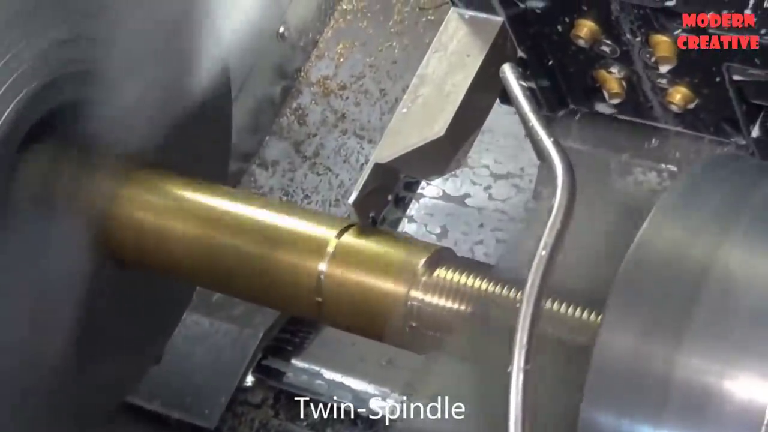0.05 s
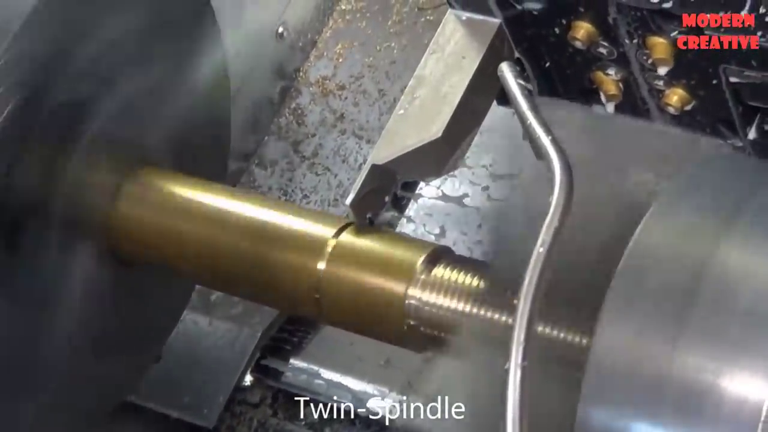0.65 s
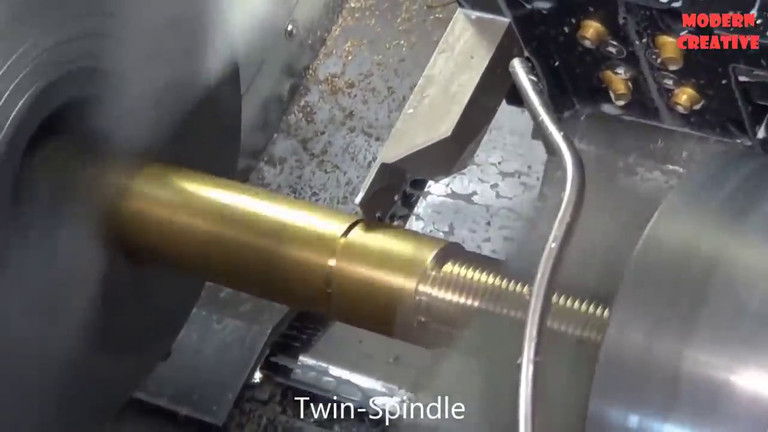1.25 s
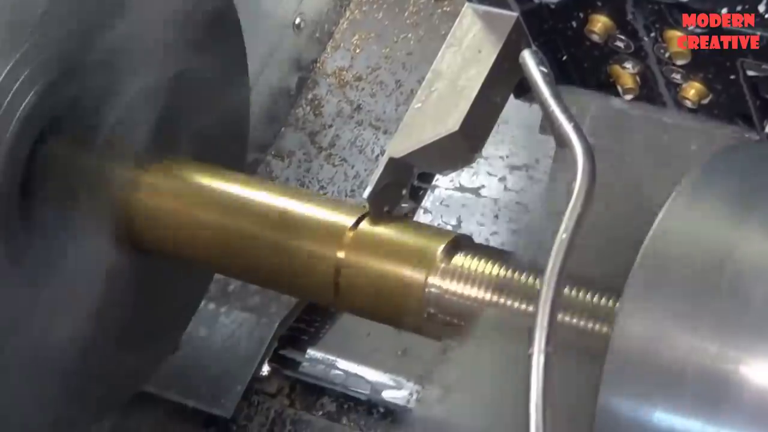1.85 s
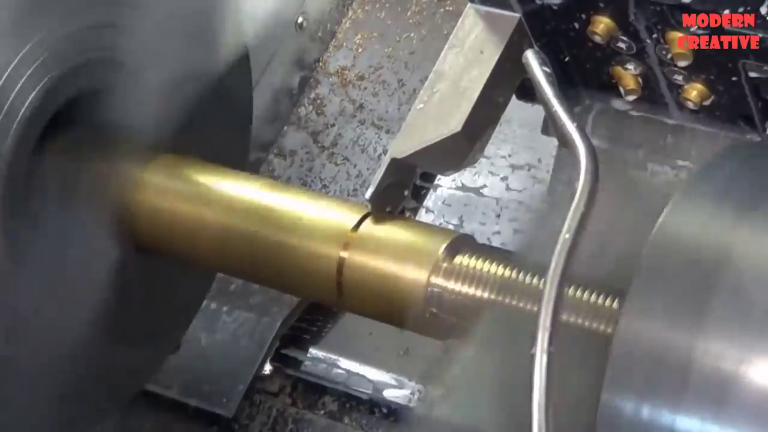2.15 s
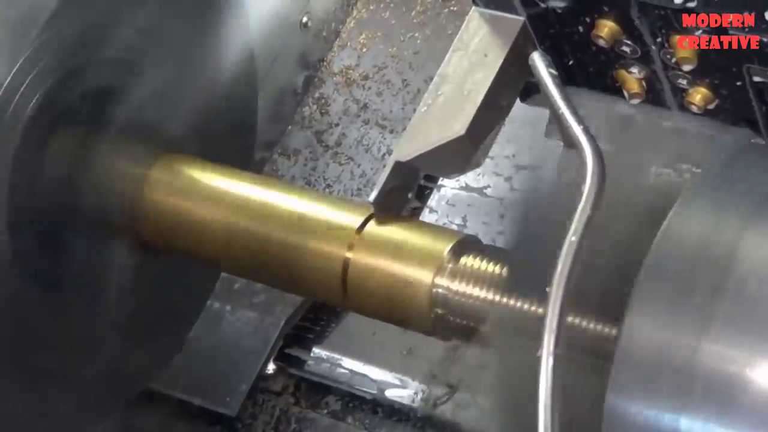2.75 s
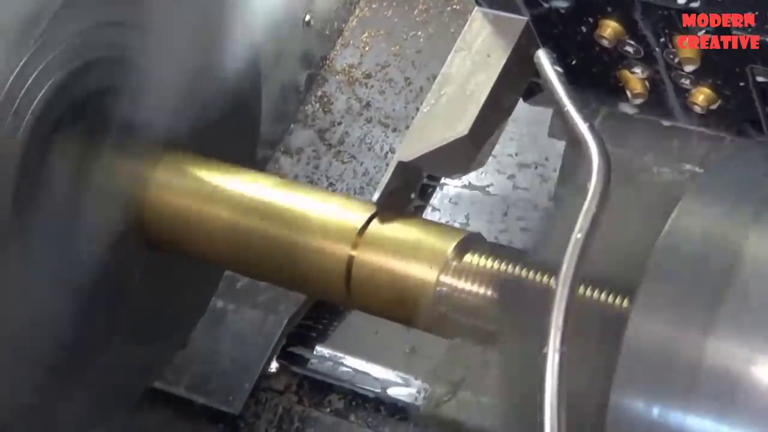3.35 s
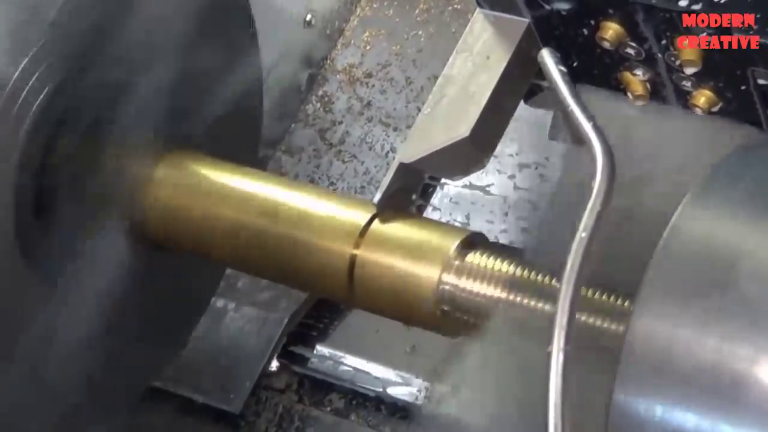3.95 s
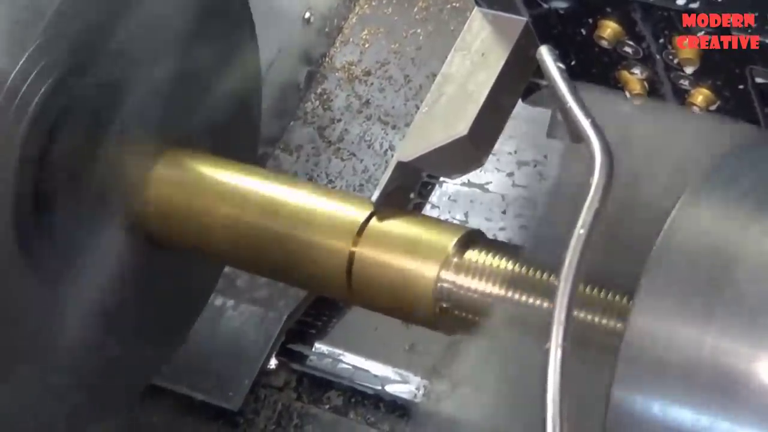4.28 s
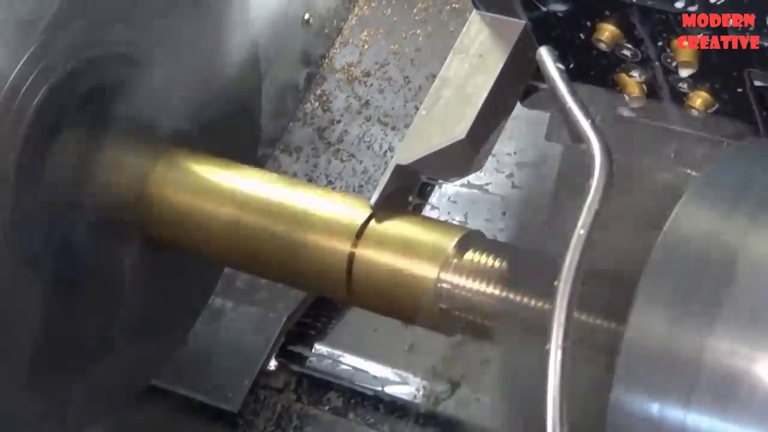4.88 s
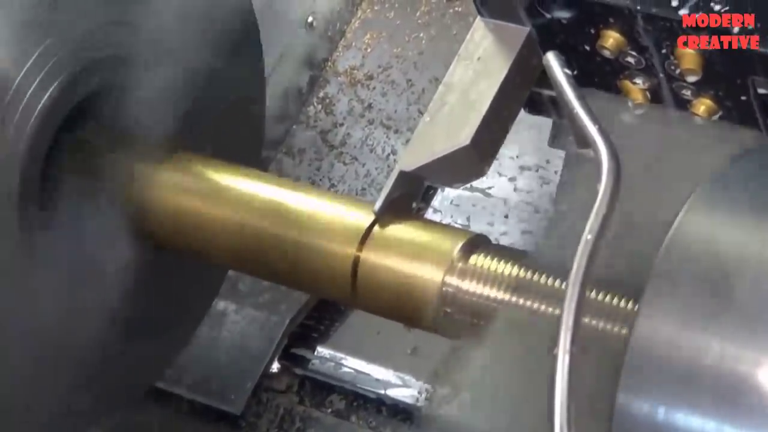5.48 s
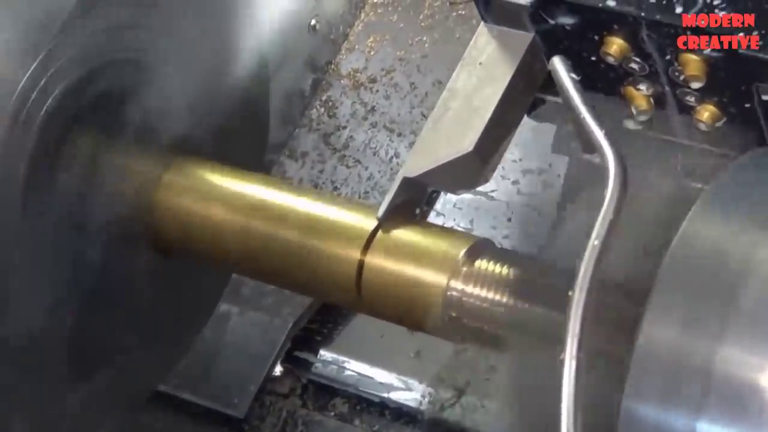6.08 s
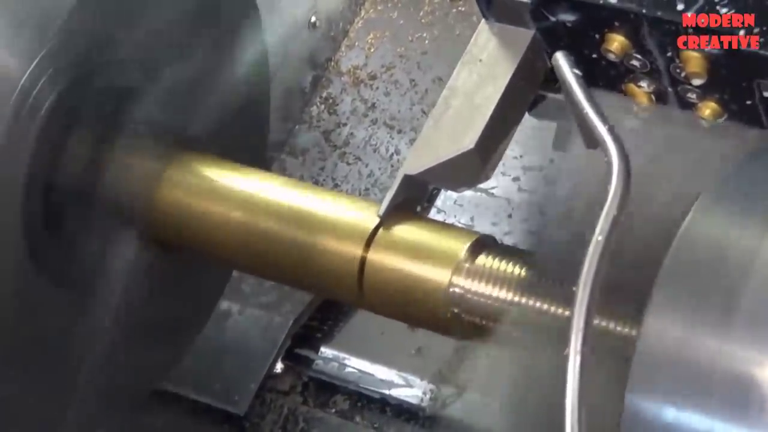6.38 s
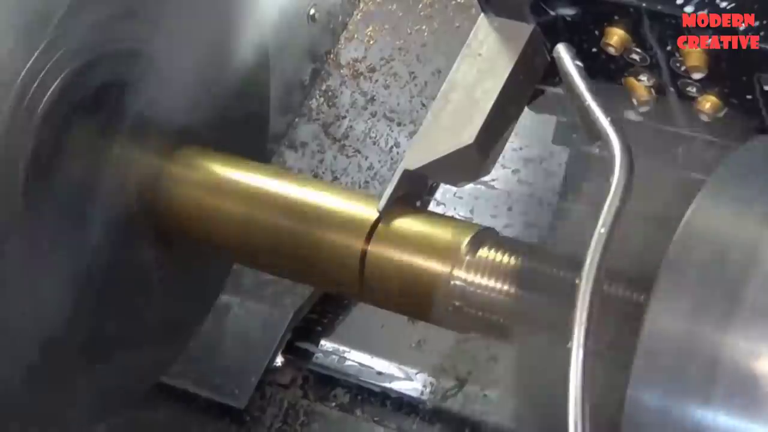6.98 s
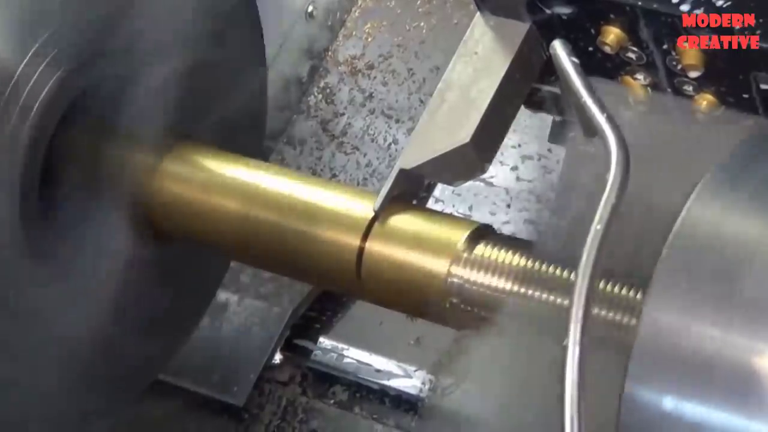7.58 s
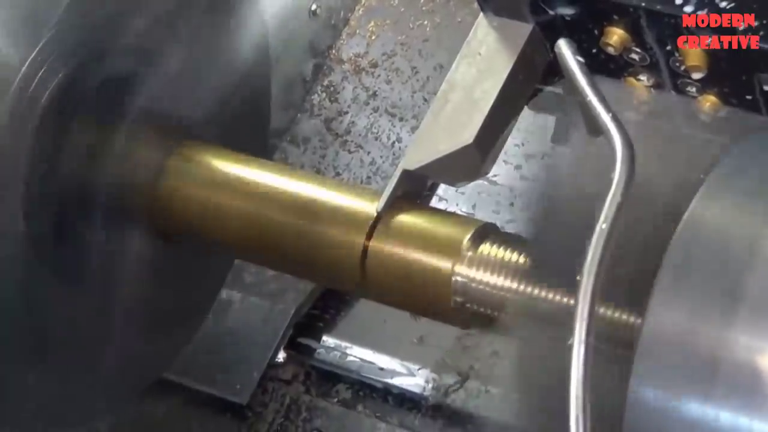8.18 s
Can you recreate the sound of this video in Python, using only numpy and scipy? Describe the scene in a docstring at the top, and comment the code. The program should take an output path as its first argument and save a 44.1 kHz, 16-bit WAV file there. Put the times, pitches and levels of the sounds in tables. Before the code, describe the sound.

A lathe blade cuts into a spinning brass bar, heard close up inside the machine's metal enclosure. A high hissing whistle slowly sinks in pitch over a steady rumble and hum. About halfway through, the blade chatters and swells into a piercing, fluttering squeal. Near the end the squeal slides downward and breaks up into a rough rubbing rasp.

```python
"""Inside the enclosure of a CNC lathe, a parting tool cuts through a spinning brass bar.
As the groove deepens the cutting speed falls, so the chip breaks off ever more slowly: a hissing
whistle that sinks over the rumble of the machine. The blade chatters at its own resonance and swells
into a squeal. The chip rate meets that squeal and drags it down, and the cut ends in a rough rasp
as the tool rubs near the centre."""
import sys
import numpy as np
from scipy import signal
from scipy.fft import rfft, irfft, next_fast_len
from scipy.io import wavfile

SR = 44100
rng = np.random.default_rng(int(sys.argv[2]) if len(sys.argv) > 2 else 0)


def wav_record(signal):
    """Record a signal, one row per channel, as 16-bit PCM in the file named by sys.argv[1]."""
    frames = np.transpose(np.atleast_2d(signal))
    bounded = np.clip(frames, -1, 1)
    # unit amplitude maps onto the largest positive 16-bit level
    quanta = np.round(bounded * 32767).astype(np.int16)
    wavfile.write(sys.argv[1], SR, quanta)


N = 362943
TIME = np.arange(N) / SR
BINS = np.maximum(np.arange(N // 2 + 1) * SR / N, 1)
TURN_HZ, CHUCK_JAWS = 15.03, 3
RUB_AT_S, RUB_RISE_S = 6.84, 1.58


def from_db(db):
    """Decibels to gain."""
    return 10 ** (np.asarray(db) / 20)


def rms_one(x):
    """Scale to unit power."""
    return x / np.sqrt(np.mean(np.abs(x) ** 2) + 1e-20)


def ramp(start_s, length_s):
    """Rise evenly from 0 to 1, then hold."""
    return np.clip((TIME - start_s) / length_s, 0, 1)


def bumps(rows):
    """Bell-shaped changes of level, in dB."""
    return sum(db * np.exp(-((TIME - s) / half_s) ** 2) for s, half_s, db in rows)


def in_time(points):
    """A curve read at every sample."""
    return np.interp(TIME, *np.transpose(points))


def at_bins(points):
    """A spectrum read on a log-frequency axis."""
    hz, value = np.transpose(points)
    return np.interp(np.log(BINS), np.log(hz), value)


def cycles(hz):
    """Phase of a changing frequency, in radians."""
    return 2 * np.pi * np.cumsum(hz) / SR


def shape(x, gain):
    """Filter by a gain given at BINS."""
    size = next_fast_len(N + 4096, True)
    response = np.interp(np.arange(size // 2 + 1) * SR / size, BINS, gain)
    return irfft(rfft(x, size) * response, size)[..., :N]


def resonances(modes):
    """Joint gain of several resonances."""
    return np.sqrt(sum(from_db(db) ** 2 / (1 + ((BINS - hz * hz / BINS) / width) ** 2)
                       for hz, width, db in modes))


def drift(rate_hz):
    """Smooth random wander of unit power."""
    pole, run_in = np.exp(-2 * np.pi * rate_hz / SR), SR // 2
    wander = signal.lfilter([1], [1, -2 * pole, pole * pole], rng.standard_normal(N + run_in))
    return rms_one(wander[run_in:])


def stereo_noise(gain):
    """Coloured noise of unit power, slightly different left and right."""
    # likeness of the channels: frequency_hz, correlation
    likeness = [(30, .99), (60, 0.88), (125, 0.95), (250, 0.97), (500, 0.96), (1000, 0.96), (2400, 1),
                (6000, 0.89), (15000, 1)]
    alike = np.clip(at_bins(likeness), 0, .995)
    mid = shape(rng.standard_normal(N), gain * np.sqrt(1 + alike))
    side = shape(rng.standard_normal(N), gain * np.sqrt(1 - alike))
    return rms_one(np.array([mid + side, mid - side]))


def each_turn(x, memory):
    """The tool meets the marks it left one turn before, so part of x comes round again."""
    lag, out = round(SR / TURN_HZ), x.copy()
    for i in range(lag, N, lag):
        out[i:i + lag] += memory * out[i - lag:i][:N - i]
    return rms_one(out)


def cut_level(db, bite_db, db_per_s, chatter_db, rub_db):
    """A layer's envelope in dB: the tool bites, the speed falls, chatter takes over, the tool rubs."""
    # brief dips in level: centre_s, half_length_s, gain_db
    dips = [(2.8, 0.34, -1), (4.196, .14, -1)]
    bite = bite_db * np.exp(-TIME / 0.69)
    chatter = chatter_db * ramp(start_s=4.03, length_s=.1)
    rub = rub_db * ramp(RUB_AT_S, RUB_RISE_S)
    return db + db_per_s * TIME + bite + chatter + rub + bumps(dips)


def chip_and_blade():
    """Chip rate and blade pitch in Hz, and their lock (0-1): once they meet they sink together."""
    # the chip breaks more slowly as the radius shrinks: time_s, rate_hz
    chip_rate = [(0, 9240), (1, 7840), (2.4, 6060), (3.3, 5510), (4, 4840), (5, 3720), (5.5, 3440),
                 (6.6, 2556), (8.23, 1230)]
    # the blade holds its pitch until the chip drags it down: time_s, pitch_hz
    blade_pitch = [(0, 2294), (6.3, 2293), (6.67, 2274), (7.19, 2152), (7.3, 2040), (7.56, 1950),
                   (7.75, 1660), (8.23, 1350)]
    pitch = in_time(blade_pitch)
    rate = np.maximum(in_time(chip_rate), pitch)
    lock_width_hz = 326
    return rate, pitch, 1 / (1 + ((rate - pitch) / lock_width_hz) ** 2)


def swing_size(pitch):
    """Chatter in dB from full swing: it grows, creeps up, weakens off resonance and collapses."""
    resonance_hz, width_hz = 2294, 116
    grow_at_s, grow_s = 3.104, 0.97
    growth_db = 12.5 * (ramp(grow_at_s, grow_s) - 1)
    creep_db = 3 * (ramp(grow_at_s + grow_s, length_s=2.25) - 1)
    detuned_db = 10 * np.log10(1 + ((resonance_hz - pitch) / width_hz) ** 2)
    collapse_db = 15 * ramp(start_s=7.5, length_s=0.22)
    return growth_db + creep_db - detuned_db - collapse_db


def holder_colour():
    """The tool holder's resonances lift the cutting noise as it passes."""
    # holder modes: pitch_hz, width_hz, gain_db
    modes = [(3605, 75, 10.5), (4300, 34, 7), (5782, 65, 14), (6300, 35, -24), (6910, 65, 4.5),
             (7440, 82, 1.5), (8960, 22, 12.5), (9360, 26, 8), (9590, 220, 8.5), (10650, 82, 8.5),
             (11350, 100, 7), (12250, 65, 7.5), (12400, 80, -5)]
    return np.sqrt(1 + resonances(modes) ** 2)


def machine():
    """Chuck and drives rumble and hum over a steady low background and a faint hiss."""
    # hum of drives and pump: pitch_hz, relative_db
    hum_tones = [(99, -85.5), (198, -70), (301, -73.5), (1130, -72)]
    # spectra of the rumble, the low background and the hiss: frequency_hz, relative_db
    rumble_colour = [(25, -28), (60, -29), (100, -18), (150, -9.5), (200, 1), (250, 0), (310, 0),
                     (460, 2.5), (580, -0.5), (750, 0), (860, -3), (945, 6.5), (1050, -5.5), (1300, -6.5),
                     (1500, 1), (3000, -13), (16000, -19)]
    shop_colour = [(20, -7), (45, -2), (70, 4), (130, 1), (400, -20), (4000, -47)]
    air_colour = [(1500, -32), (6000, 13), (10000, -9), (13500, 10), (15700, -2)]
    level_db = cut_level(db=-51.5, bite_db=-6.5, db_per_s=-0.5866, chatter_db=-3.5, rub_db=12)
    hum = sum(from_db(db + 4 + 2 * drift(16)) * np.sin(cycles(hz + 2.365 * drift(5.5)))
              for hz, db in hum_tones)
    rumble = from_db(level_db + 1.55 * drift(26)) * stereo_noise(from_db(at_bins(rumble_colour)))
    shop = from_db(-79) * stereo_noise(from_db(at_bins(shop_colour)))
    air = from_db(-50) * stereo_noise(from_db(at_bins(air_colour)))
    return rumble + hum * from_db(level_db - np.mean(level_db)) + shop + air


def chip_whistle(swing_db, rate, pitch, lock, holder):
    """The chip shears off almost regularly; the swinging blade chops it into sum tones and rasps."""
    # tones at the chip rate plus a multiple of the blade's pitch: multiple, relative_db
    sum_tones = [(1, 1.5), (2, -4.5), (3, -4), (4, -5), (5, -19)]
    # the whistle swells or fades for a moment: centre_s, half_length_s, gain_db
    swells = [(3.2, 0.38, 2), (4.15, 0.28, -3), (4.55, 0.13, 4), (5.1, 0.18, 1), (5.9, 0.53, -4),
              (7.05, 0.23, -8), (8.15, 0.25, -1)]
    jitter_hz, slip_hz = 452, 57.9
    irregular = .069 * (1 - lock) + .048 * lock   # share of the rate; steadier when locked
    shear = cycles(rate * (1 + irregular * drift(jitter_hz)))
    contact = cycles(pitch + slip_hz * drift(jitter_hz))   # the contact slips, so high tones blur
    audible = lambda hz: np.clip((SR * .45 - hz) / 2000, 0, 1)

    octave_db = cut_level(db=-3, bite_db=-7, db_per_s=-0.32, chatter_db=-12, rub_db=11.5) + 12.5 * lock
    force = from_db(bumps(swells)) * np.cos(shear)
    force += from_db(octave_db) * np.cos(2 * shear) * audible(2 * rate)
    chopping = from_db(-4 + 0.48 * swing_db - 12 * lock)
    radiated = np.clip((rate - pitch) / 1570, 0, 1) ** 2   # a low difference tone radiates poorly
    force += from_db(-7) * chopping * radiated * np.cos(shear - contact)
    rasping = lock * from_db(0.38 * swing_db)
    for k, db in sum_tones:
        sum_gain = chopping * from_db(0.13 * (k - 1) * swing_db) * audible(rate + k * pitch)
        overtone = rasping * np.cos((k + 1) * contact)
        force += from_db(db) * (sum_gain * np.cos(shear + k * contact) + overtone)
    level_db = cut_level(db=-28.5, bite_db=-0.5, db_per_s=-1.87, chatter_db=-3, rub_db=0.5) + 5.5 * lock
    return shape(from_db(level_db) * force, holder)


def chip_hiss(holder):
    """Bright noise of the chip, coloured by the holder."""
    # hiss spectrum: frequency_hz, relative_db
    colour = [(100, -63), (900, -6), (1750, -17), (2050, -100), (2500, 6), (3100, -11.5), (3600, -0.5),
              (4900, -3.5), (6500, -6), (8200, -3.5), (9600, 0), (12400, 2), (13200, -23), (15700, -6)]
    # the hiss flares as the chatter frays: centre_s, half_length_s, gain_db
    flare = [(7.33, 0.15, 4.5)]
    level_db = cut_level(db=-31, bite_db=-12.5, db_per_s=-1.07, chatter_db=-4, rub_db=-2.5)
    return from_db(level_db + bumps(flare)) * stereo_noise(from_db(at_bins(colour)) * holder)


def neck_ringing():
    """The half-severed part rings unsteadily on its neck."""
    # the bending mode sinks as the neck thins: time_s, pitch_hz
    bending = [(0, 1627), (4, 1393), (5, 1270), (7, 1049), (8.23, 1042)]
    level_db = cut_level(db=-55.5, bite_db=-8, db_per_s=-0.25, chatter_db=-9.5, rub_db=20.5)
    waver = drift(41) + 1j * drift(41)
    return from_db(level_db) * (waver * np.exp(1j * cycles(in_time(bending)))).real


def blade_ringing():
    """Uneven knocks of the chips keep the blade's modes ringing."""
    # modes of blade and holder: pitch_hz, width_hz, relative_db
    modes = [(1966, 13.5, -8), (2297, 47.5, 4.5), (2810, 32, -14.5), (3340, 43, -12.5), (3610, 27, -13),
             (3980, 19, -29), (5663, 52, -9.5), (10000, 63, -13), (9400, 83, -37), (12240, 190, -26.5)]
    level_db = cut_level(db=-37.5, bite_db=-4, db_per_s=0.0236, chatter_db=-4, rub_db=10)
    knocks = each_turn(rng.standard_normal(N) * from_db(3 * drift(46)), memory=0.56)
    low_cut = 1 / np.sqrt(1 + (1700 / BINS) ** 8)
    return from_db(level_db) * rms_one(shape(knocks, resonances(modes) * low_cut))


def enclosure(x, t60_s, wet_db):
    """Close sheet-metal walls add a short, dense tail to the direct sound."""
    t = np.arange(SR // 4) / SR
    mid, side = rng.standard_normal((2, len(t))) * from_db(-60 * t / t60_s) * (t > .001)
    tail = np.array([mid + 0.32 * side, mid - 0.32 * side])
    tail = from_db(wet_db) * tail / np.sqrt(np.sum(tail ** 2, axis=1, keepdims=True))
    return (x + signal.fftconvolve(x, tail, axes=1)[:, :N]) / np.sqrt(1 + from_db(wet_db) ** 2)


def squeal(swing_db, pitch, lock):
    """The blade's self-excited swing wavers turn by turn, limits its own size and stumbles."""
    # the blade briefly loses its swing, singly or about once a turn: start_s, count, depth (0-1)
    stumbles = [(4.063, 2, 0.9), (4.24, 1, 0.4), (4.325, 1, 0.94), (4.53, 1, 1), (4.615, 1, 1),
                (5.089, 1, .9), (6.074, 6, 0.73), (6.527, 7, 0.99)]
    flutter_hz, stumble_every_s = 47.6, .069
    stumble_s = 0.0029 * (1 + .6 * lock)
    rough = np.clip(0.12 * from_db(-3.5 * swing_db) + 0.73 * lock, 0, .98)   # rough if weak or locked
    waver = each_turn(drift(flutter_hz) + 1j * drift(flutter_hz), memory=.95)
    size = np.sqrt(1 - rough ** 2) + rough * waver
    size /= (.5 + .5 * np.abs(size) ** 4) ** (.19 * (1 - .45 * lock))   # soft limiting
    for start_s, count, depth in stumbles:
        for s in start_s + stumble_every_s * np.arange(count):
            size *= 1 - depth / (1 + 1j * (TIME - s) / stumble_s)   # shrinks and slips in phase
    tone = size * np.exp(1j * cycles(pitch))
    octave = from_db(-31.5) * tone ** 2
    level_db = -23 + swing_db - lock ** 2
    return np.sqrt(2) * from_db(level_db) * (tone + octave).real


def rubbing_rasp(holder):
    """Near the centre the tool rubs rather than cuts, and a rough noise fades in."""
    # rasp spectrum: frequency_hz, relative_db
    colour = [(30, -55), (150, -38), (600, -5), (1050, -3.5), (1800, -12), (2700, 3), (3100, -15),
              (3600, -1), (5000, -5), (8000, -39), (16000, -35)]
    envelope = ramp(RUB_AT_S, RUB_RISE_S) * from_db(-40 + 2 * drift(50.3))
    return envelope * stereo_noise(from_db(at_bins(colour)) * holder)


def pan_cut(cut):
    """Place each band of the cut between left and right by level and phase."""
    # balance: frequency_hz, left_over_right_db
    balance = [(200, -3), (1200, 2), (2300, -3), (3600, 0), (5800, -2.5), (8000, 0), (10000, 0.8),
               (15000, 0.5)]
    # phase between the channels: frequency_hz, left_lead_rad
    lead = [(200, 0.98), (2300, 0.35), (5900, 0.26), (11000, 0.71), (12100, 0.52), (15900, .1)]
    toward_left = from_db(at_bins(balance) / 2) * np.exp(.5j * at_bins(lead))
    return np.array([shape(cut[0], toward_left), shape(cut[1], 1 / toward_left)])


def scene():
    """The cut, pulsing slightly with each turn and each jaw of the chuck, over the running machine."""
    rate, pitch, lock = chip_and_blade()
    swing_db = swing_size(pitch)
    holder = holder_colour()
    turn = 2 * np.pi * TURN_HZ * TIME
    load_db = 0.14 * np.sin(turn) + 0.31 * np.sin(CHUCK_JAWS * turn)
    load_db += 0.83 * each_turn(drift(41), memory=0.1)
    cut = chip_whistle(swing_db, rate, pitch, lock, holder) + chip_hiss(holder) + rubbing_rasp(holder)
    cut = enclosure(cut, t60_s=0.11, wet_db=-0.5) + neck_ringing() + blade_ringing()
    cut = from_db(load_db) * cut + squeal(swing_db, pitch, lock)
    return pan_cut(cut) + machine()


def record(dry):
    """A steep low-pass takes off the top above 15.8 kHz."""
    return signal.sosfiltfilt(signal.ellip(10, .05, 60, 15800, fs=SR, output="sos"), dry)


dry = scene()
out = record(dry)
wav_record(out)
```